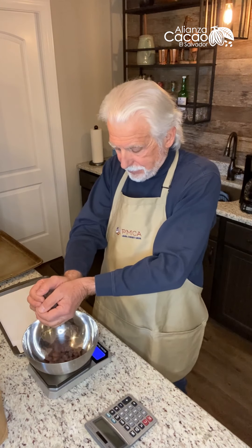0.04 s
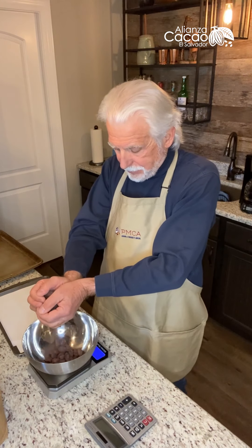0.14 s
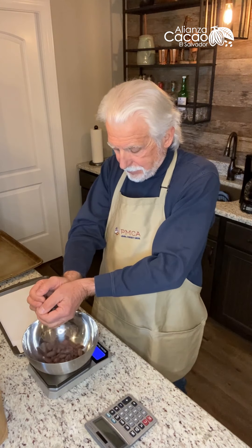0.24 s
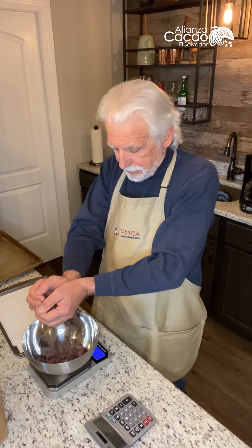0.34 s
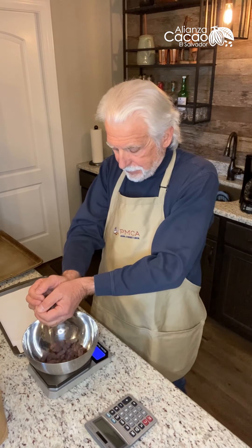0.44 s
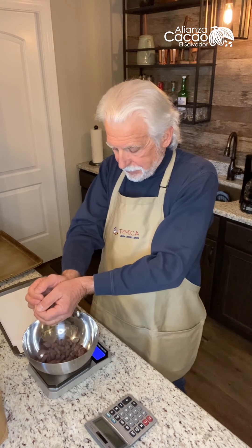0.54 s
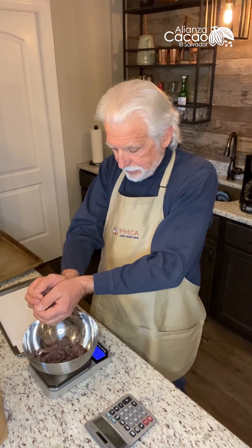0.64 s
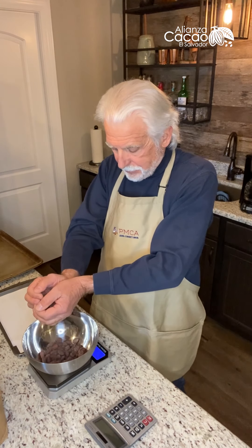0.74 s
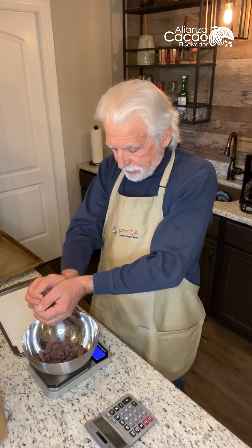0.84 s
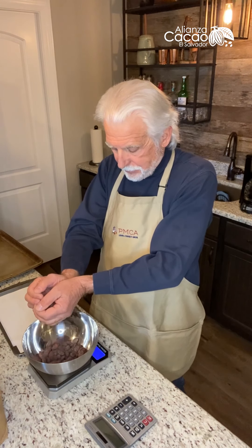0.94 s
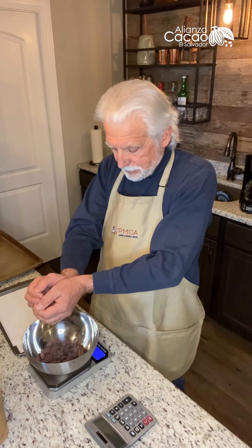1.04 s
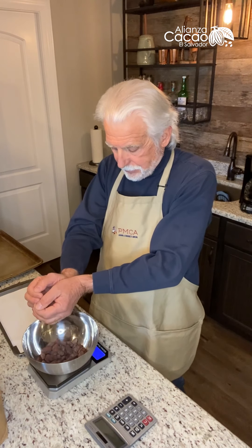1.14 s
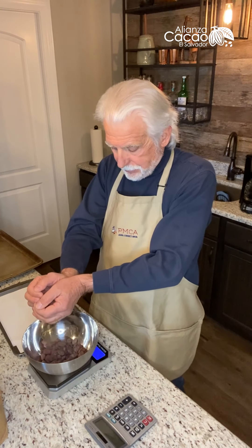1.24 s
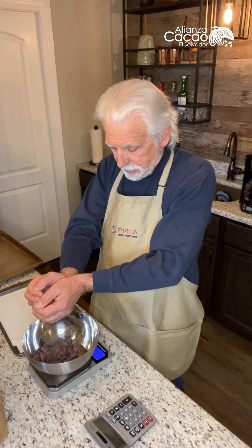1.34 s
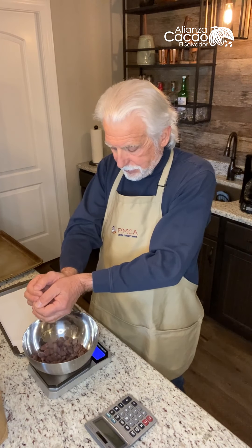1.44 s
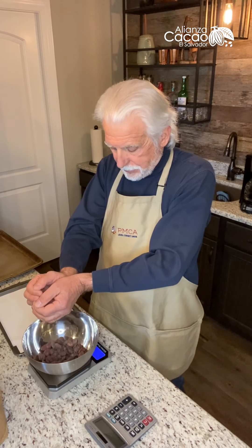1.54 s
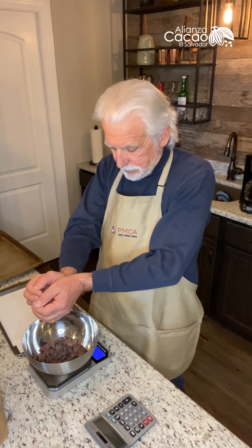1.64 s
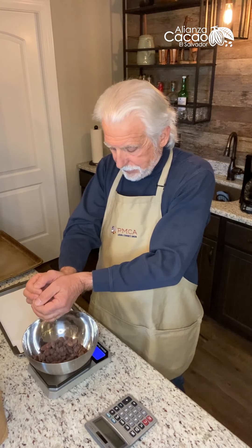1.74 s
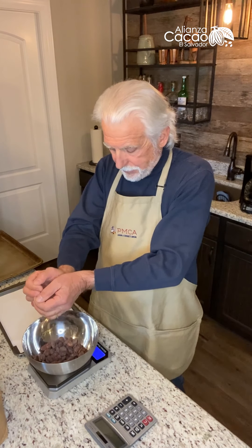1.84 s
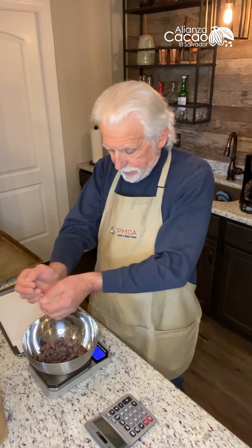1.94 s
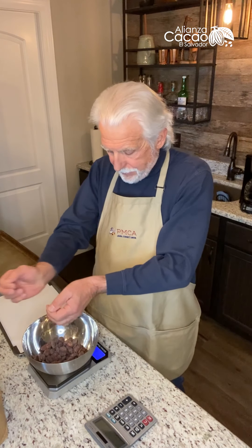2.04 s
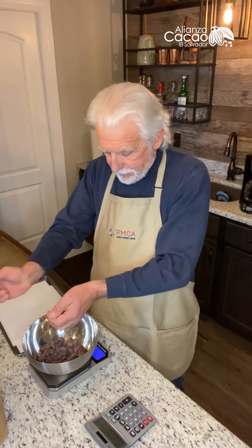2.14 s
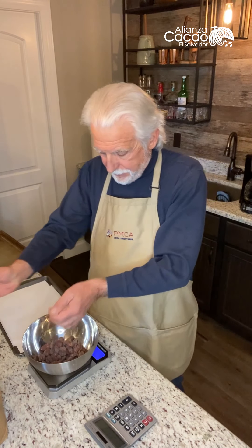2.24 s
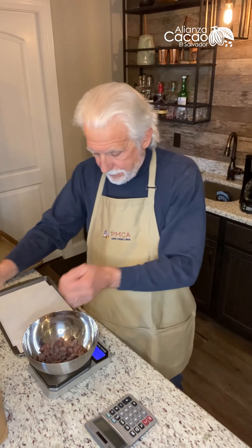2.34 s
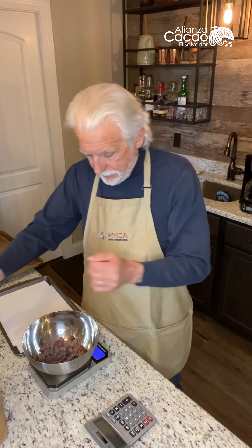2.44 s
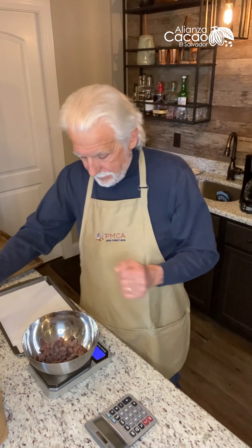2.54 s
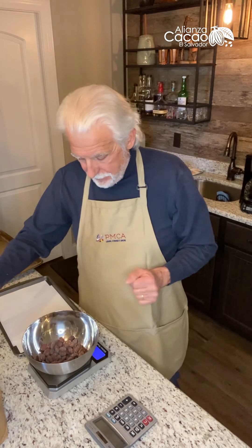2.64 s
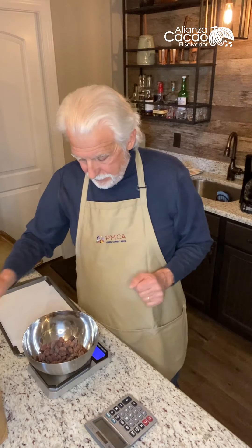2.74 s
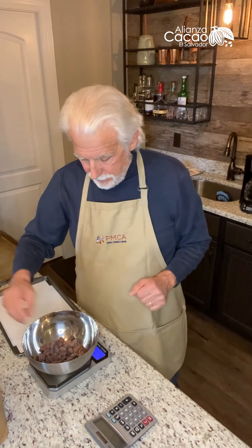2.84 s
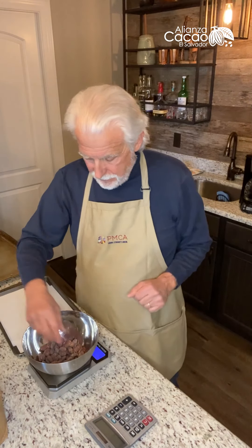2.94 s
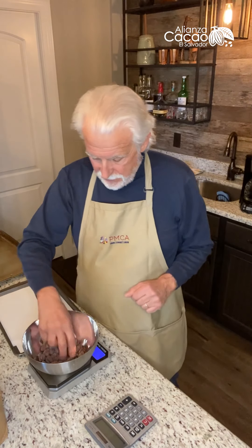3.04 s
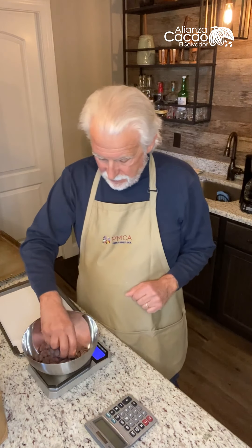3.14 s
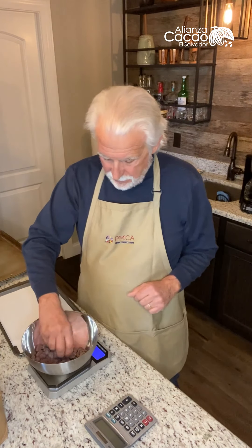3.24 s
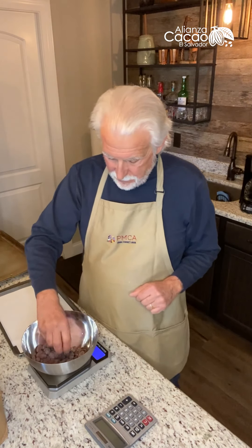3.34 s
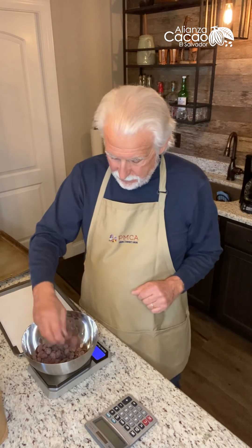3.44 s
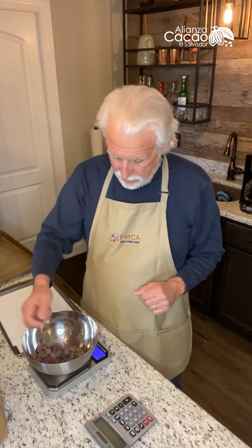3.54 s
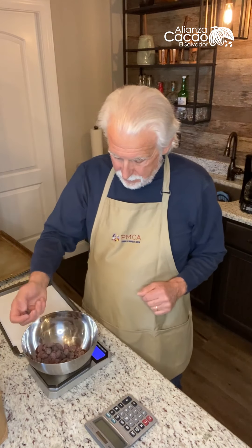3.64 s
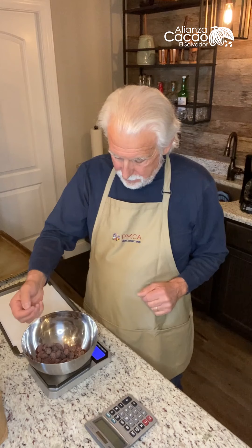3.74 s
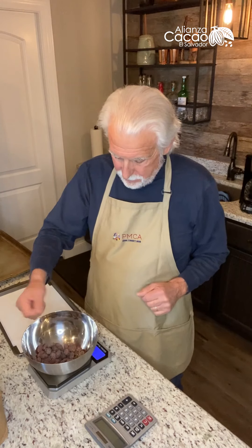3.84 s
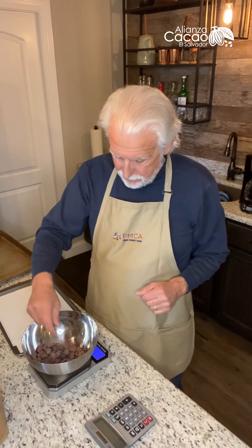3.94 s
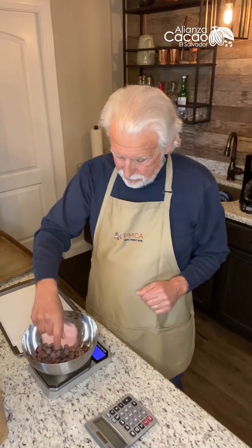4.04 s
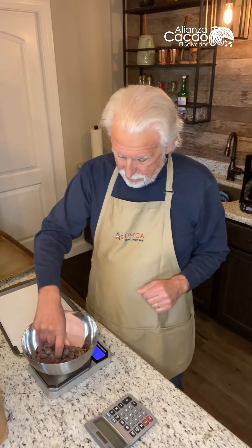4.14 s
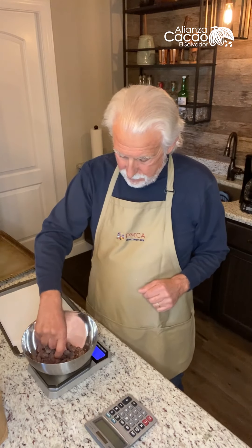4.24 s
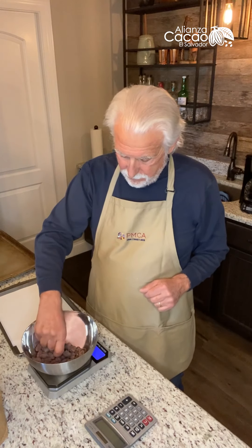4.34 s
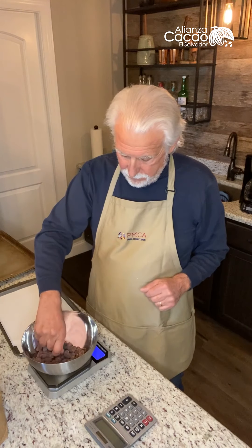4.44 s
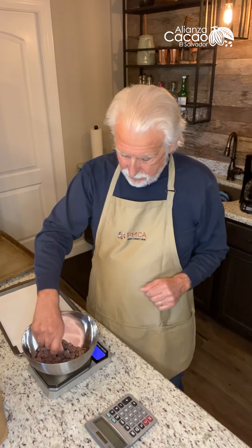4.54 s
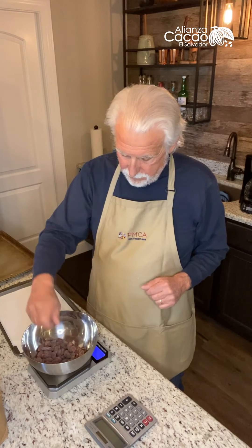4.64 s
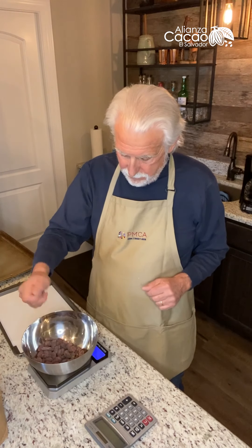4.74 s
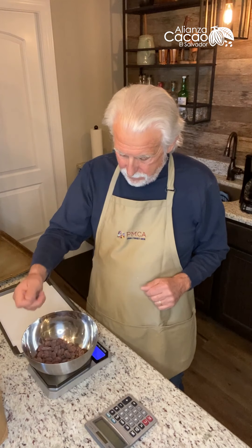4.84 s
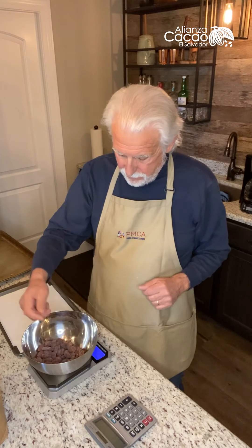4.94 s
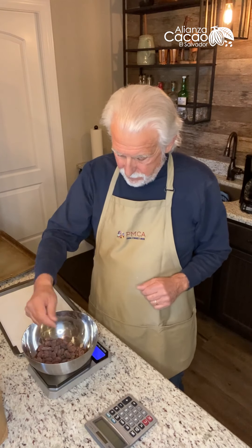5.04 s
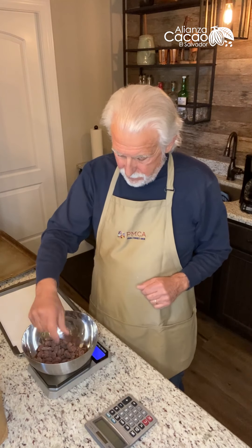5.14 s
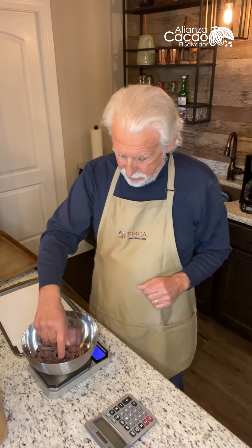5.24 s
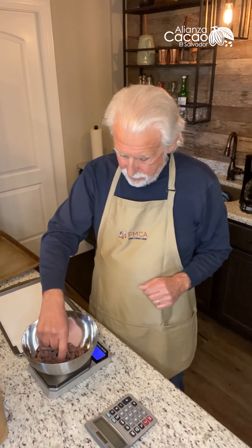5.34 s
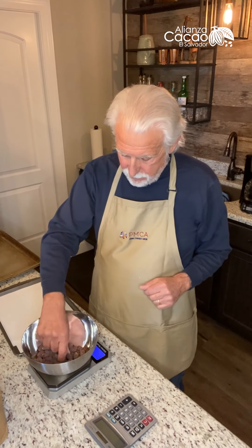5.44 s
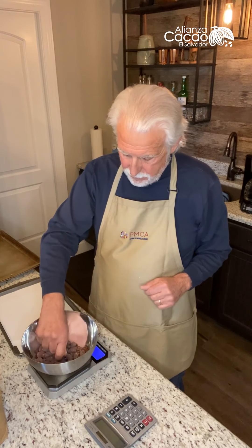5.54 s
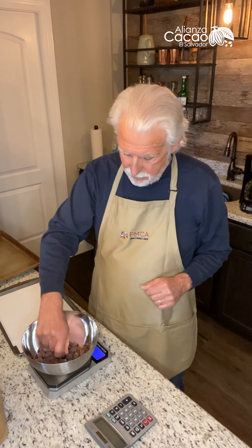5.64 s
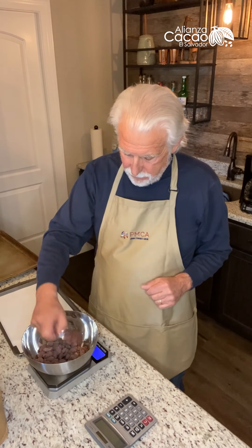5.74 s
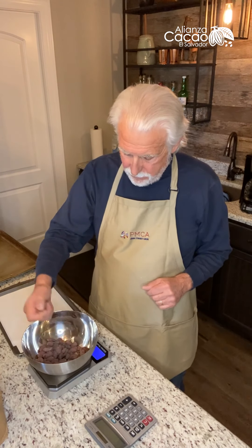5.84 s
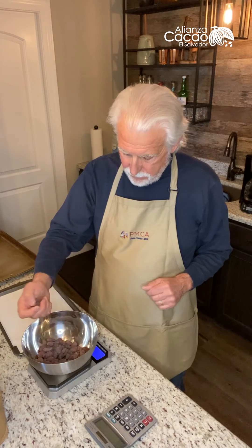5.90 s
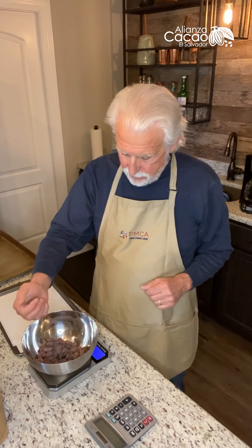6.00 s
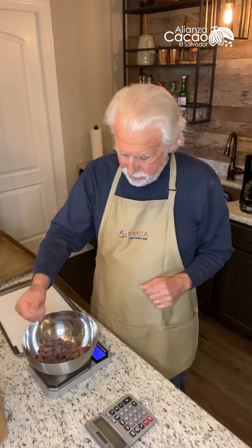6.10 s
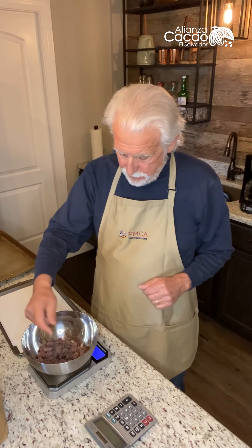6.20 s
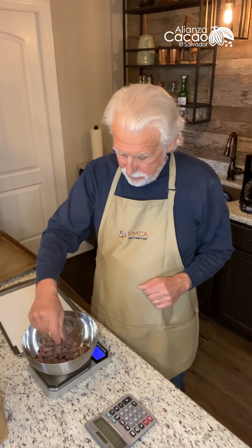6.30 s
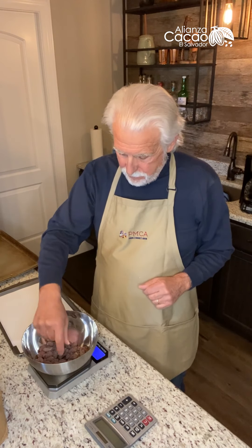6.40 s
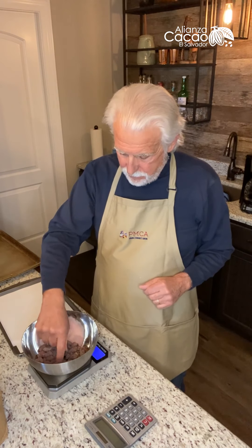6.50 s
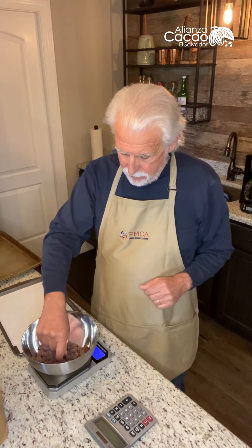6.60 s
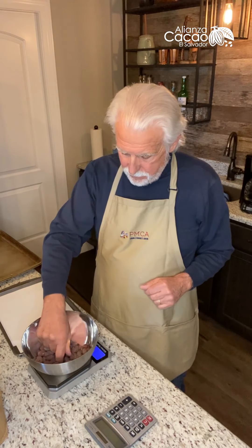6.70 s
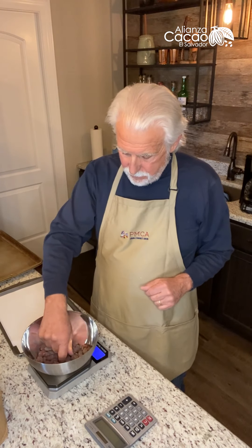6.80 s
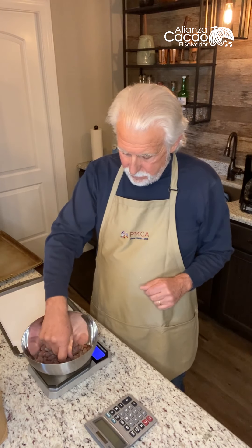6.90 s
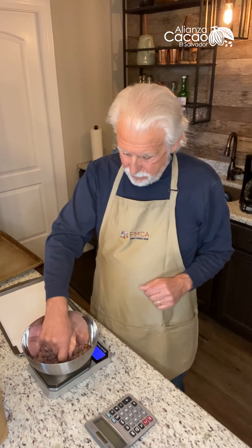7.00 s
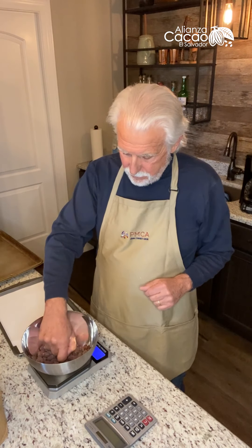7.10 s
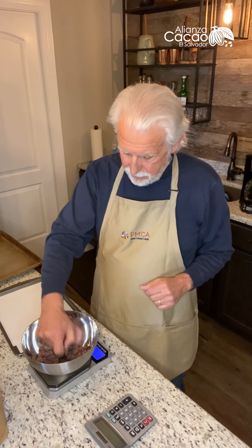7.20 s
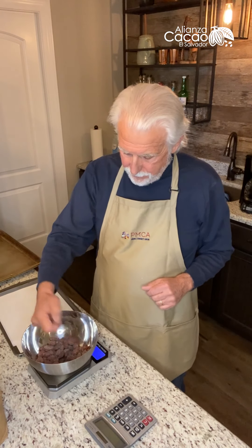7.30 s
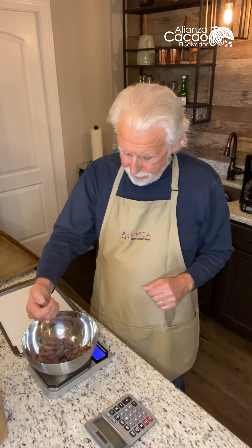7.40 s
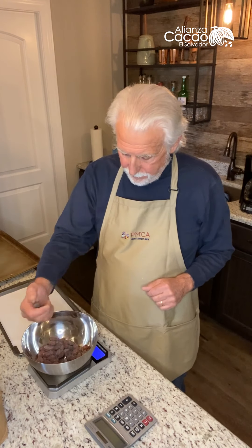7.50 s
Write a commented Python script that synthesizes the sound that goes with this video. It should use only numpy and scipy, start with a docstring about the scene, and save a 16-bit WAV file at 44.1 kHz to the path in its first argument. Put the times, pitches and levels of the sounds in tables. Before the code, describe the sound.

Close by in a hard, lively kitchen, dried cocoa beans pour from two hands into a steel bowl, with dry clicks, dull knocks and bright metallic pings. The dense rattle thins to stray beans, followed by small counter bumps. Then fingers rummage through the beans four times, in softer, crunchy shuffles with gaps between. A low appliance hum and faint rush of air run underneath.

```python
"""In a hard, ringing kitchen, dried cocoa beans fall from two hands into a steel bowl on a kitchen scale.
Then fingers rummage in the bowl four times. Each contact layers a knock of the loaded base (noise and modes),
a dry husk click (noise and a short note) and a ping of the thin wall (a crowd of high modes).
Bumps and light clinks sound on the counter, and an appliance hums in a low rush of air.
Sparse, decaying reflections place the beans and the counter in the room."""
import sys
import numpy as np
from scipy import signal
from scipy.fft import rfft, irfft
from scipy.io import wavfile
from scipy.ndimage import uniform_filter1d, minimum_filter1d

SR = 44100
rng = np.random.default_rng(int(sys.argv[2]) if len(sys.argv) > 2 else 0)


def waveform_to_disk(signal):
    """Save audio, clipped to [-1, 1], as 16-bit WAV at the path in sys.argv[1]."""
    frames = np.transpose(np.atleast_2d(signal))
    scaled = np.clip(frames, -1, 1) * 32767
    samples = np.round(scaled).astype(np.int16)
    wavfile.write(sys.argv[1], SR, samples)


N = 333449
AGE = np.arange(6144) / SR  # time since a contact, s

# Blow levels are rms over 10 ms. Colours and mode levels are relative.
# Single beans striking:
# [t/s, knock level/dB, knock centre f/Hz, click level/dB, click centre f/Hz, ping level/dB, ping centre f/Hz]
BEANS = [(0.005, -27, 1130, -28.5, 4450, -13, 9300), (0.06, -34, 1324, -33, 3900, -35, 8530),
         (0.102, -32, 970, -26.5, 3780, -7.5, 8300), (0.133, -31.5, 1400, -24, 4200, -32, 8450),
         (0.2003, -23.5, 1400, -21, 4200, -23.5, 8800), (0.224, -34, 1390, -31, 3360, -16.5, 9200),
         (0.236, -40, 1190, -42, 4230, -9.5, 8950), (0.25, -22, 1260, -23, 4330, -7.5, 10200),
         (0.2956, -30, 1260, -29, 4660, -10, 9000), (0.304, -24.5, 1120, -28, 3900, -29, 8940),
         (0.3304, -39, 1090, -29.5, 4500, -16, 8800), (0.365, -45, 1200, -44, 3900, -23, 10300),
         (0.404, -33, 930, -31, 4470, -21, 9200), (0.416, -31, 1099, -33, 4760, -16.5, 8370),
         (0.433, -27, 1241, -29.5, 4970, -14, 9770), (0.46, -43, 1299, -33, 2640, -21, 10120),
         (0.465, -29.5, 1360, -33.5, 2000, -31, 10050), (0.489, -48, 1200, -35, 2690, -30, 9400),
         (0.509, -33, 1350, -30, 2500, -28, 9100), (0.5499, -25, 1290, -37, 4330, -16.5, 9400),
         (0.559, -25.5, 1320, -23, 3250, -20.5, 9750), (0.568, -29.5, 1200, -29, 3798, -17, 9580),
         (0.6084, -31, 1030, -30.5, 4770, -11, 8440), (0.6544, -29, 1060, -25.5, 4920, -13.5, 8400),
         (0.7194, -34, 1290, -37, 5300, -24, 7600), (0.788, -39, 1180, -44, 2000, -31, 10100),
         (0.8328, -40.5, 1240, -48, 2400, -30.5, 8300), (0.864, -41.5, 1260, -49, 3340, -41, 9130),
         (0.89, -31.5, 1010, -31.5, 6330, -47, 8680), (0.9005, -42.5, 850, -36.5, 5830, -27, 9800),
         (0.984, -24, 950, -36, 4680, -23.5, 8800), (1.014, -58, 1070, -36.5, 4100, -29.5, 8560),
         (1.0411, -21, 1320, -25, 3000, -32, 8670), (1.061, -55, 1370, -38, 2000, -27, 11500),
         (1.121, -23, 1050, -27.5, 4540, -21, 9100), (1.155, -48, 960, -34.5, 5340, -28, 9500),
         (1.206, -50, 1200, -39, 4600, -31, 9200), (1.2359, -31, 1230, -28.5, 6680, -15, 10700),
         (1.278, -23.5, 936, -35.5, 4050, -33, 9370), (1.2916, -38, 1030, -29.5, 5430, -7.5, 9400),
         (1.3177, -33.5, 990, -33.5, 5000, -25.5, 9600), (1.33, -32, 860, -38, 4550, -28, 9580),
         (1.3894, -31.5, 1100, -29.5, 5500, -21.5, 10200), (1.425, -33, 850, -36.5, 3900, -35, 9800),
         (1.466, -36, 1030, -26, 6470, -21, 7900), (1.4768, -32.5, 895, -33.5, 4280, -24.5, 10300),
         (1.483, -25.5, 950, -30, 4460, -23, 9550), (1.596, -42.5, 1200, -46.5, 3900, -42, 9000),
         (1.729, -55, 888, -55, 4195, -48, 8100), (2.2759, -32.5, 950, -32.5, 5530, -30, 8900),
         (2.3423, -38, 995, -40, 3300, -37, 9080), (3.088, -46, 1224, -63.5, 2000, -81.5, 9200),
         (3.116, -37, 1090, -39.5, 3350, -37, 8600), (3.162, -51, 1270, -36.5, 5660, -34, 7700),
         (3.19, -37, 890, -41, 3000, -38, 8200), (3.205, -42, 970, -39, 3240, -27, 7700),
         (3.249, -41.5, 950, -40, 3340, -38, 9070), (3.32, -38, 990, -52, 2000, -49.5, 8800),
         (3.34, -62, 1290, -37.5, 2210, -54.5, 8850), (3.379, -36, 900, -39.5, 3460, -39, 8740),
         (3.454, -43, 1280, -40, 2380, -59, 9100), (3.532, -41.5, 1080, -45, 2000, -66.5, 8900),
         (4.218, -37.5, 1400, -39.5, 2650, -49, 8950), (4.248, -46, 1290, -51, 2200, -31, 9000),
         (4.291, -47, 1200, -40.5, 3020, -39, 8800), (4.355, -41, 1030, -40, 4380, -29, 10000),
         (4.44, -45, 1400, -55.5, 2400, -54.5, 8800), (4.509, -43.5, 994, -57, 2590, -53.5, 8800),
         (4.587, -46, 900, -53.5, 5500, -52, 8720), (4.563, -50, 1096, -56.5, 3030, -46.5, 9100),
         (4.623, -58.5, 1098, -49.5, 6980, -44.5, 8560), (5.424, -45, 1200, -51, 2630, -49.5, 8500),
         (5.458, -40, 1310, -39, 3350, -42, 8400), (5.538, -42, 1150, -43, 2790, -51.5, 8500),
         (5.571, -37, 1230, -36, 3850, -35.5, 8300), (5.582, -44, 1100, -39, 4160, -43.5, 8000),
         (5.624, -40.5, 1040, -47.5, 2600, -51, 8400), (5.722, -56, 1090, -51.5, 4490, -54, 8400),
         (5.745, -56.5, 1090, -45, 2000, -55, 8400), (5.778, -48, 1200, -57, 2000, -48.5, 9500),
         (5.854, -60, 1200, -65.5, 2596, -59, 8900), (5.899, -52, 1275, -58, 2400, -65.5, 8570),
         (6.585, -50.5, 1075, -58, 3400, -39.5, 9100), (6.615, -55, 1200, -41.5, 2900, -43, 8600),
         (6.64, -51, 950, -42.5, 2850, -56, 8600), (6.694, -40, 1170, -32, 3060, -36, 8700),
         (6.721, -40, 1010, -38, 3450, -43, 8600), (6.81, -45, 1200, -42, 3200, -47, 8600),
         (6.941, -57, 900, -63, 3000, -49.5, 8650), (7.069, -54.5, 1110, -54, 5500, -49, 8200),
         (7.083, -54, 1090, -56.5, 5500, -54, 8500)]
# Hard blows that flex the whole bowl: [t/s, level/dB]
FLEXES = [(0.2004, -21), (0.559, -35), (1.0409, -23), (7.2144, -41)]
# What the flexing bowl rings with: [f/Hz, level/dB, t60/s]
FLEX_MODES = [(967, -8.5, 0.23), (1110, -8.5, 0.17), (1324, 1.5, 0.092), (1457, 0, 0.08), (1503, -7, 0.12),
              (2070, -13.5, 0.12), (2220, -7.5, .09), (2330, -8, .11), (2713, -12, 0.15), (2880, -16, .1)]
# The base of the bowl, damped by the beans: [f/Hz, level/dB, t60/s], f before detuning
BASE_MODES = [(719.8, 2.5, 0.2), (883.4, -4, 0.09), (939, -1, 0.19), (1020, -7, 0.15), (1125, -3.5, 0.19),
              (1320, -1, 0.077), (1404, -1.5, 0.096), (1520, -5.5, 0.14)]
# Colour of the base knock: [f/Hz, level/dB]
KNOCK = [(40, -58.5), (90, -31.5), (200, -29.5), (330, -15.5), (480, -14.5), (720, -5), (1350, -6.5),
         (1600, -5), (1950, -20), (4000, -39)]
# Colour of the husk click: [f/Hz, level/dB], before random variety
HUSK = [(60, -60.5), (600, -29), (1750, -5.5), (2300, 2.5), (3000, 0), (3600, -2.5), (4300, -8), (5600, 0),
        (7000, 2), (10000, -6), (15000, -31.5)]
# Each hollow bean has a short note in this range; its level is against its click
SHELL_HZ, SHELL_T60, SHELL_DB = (1940, 6260), 0.016, -8.5  # Hz, s, dB
# Colour of the wall modes: [f/Hz, level/dB]
WALL = [(7400, -6.5), (8100, -1), (10200, -2), (11000, -4), (13000, 2), (14600, -20), (15600, -20.5)]
# Surges of many small bean contacts, in the bowl, in the supply beside it or in the hand;
# the pour has fewer contacts per second than the stirring, and its first two surges are the hardest:
# [t/s, hold/s, settling/(dB/s), knock level/dB, click level/dB, ping level/dB,
#  hardness/(factor on knock and click centres, before scatter), mean contacts/(1/s)]
SURGES = [(0, 0.35, 287.5, -38, -33.5, -31, 1.55, 142), (0.403, 0.22, 197, -33.5, -34, -26.5, 1.55, 160),
          (1.055, 0.13, 200, -41.5, -41.5, -42, 1.1, 150), (1.384, 0.025, 114, -37.5, -40, -29, 0.73, 230),
          (2.571, 0.13, 119, -63, -64.5, -69.5, 0.88, 380), (3.089, 0.17, 72, -39, -42.5, -35.5, 1.05, 750),
          (3.86, 0.071, 183, -86, -79.5, -76.5, 1.1, 270),
          (4.19, 0.19, 132.5, -43.5, -47.5, -42, 1.25, 480),
          (4.415, 0.19, 284.5, -49.5, -58.5, -53.5, 0.78, 300),
          (4.783, 0.058, 203, -81.5, -80, -65.5, 0.91, 360),
          (4.907, 0.07, 150.5, -76, -70, -78.5, 0.66, 350), (5.055, 0.071, 198, -81, -70.5, -66, 0.91, 300),
          (5.392, 0.17, 69, -41.5, -43, -45.5, 1.1, 480), (6.566, 0.14, 108, -46.5, -49, -49, 1.15, 780),
          (6.69, 0.063, 113, -43.5, -44.5, -42, 1.1, 540), (6.897, 0.1, 255.5, -54.5, -63, -54, 1, 350),
          (7.054, 0.14, 130.5, -49, -55, -49, 1.1, 400), (7.242, 0.039, 119, -54, -63, -79.5, 0.85, 800)]
RISE_S, SAG_DB_PER_S = 0.021, 12.5  # a surge builds up quickly and sags a little from its start
WALL_FOLLOW = 1.1  # the pings drop this many times faster in dB than knocks and clicks
SETTLED_DB = 25  # a surge ends once settling, apart from the sag, has lowered it this far

# Bumps on the counter:
# [t/s, thump level/dB before trim, clack level/dB, tick level/dB, tick centre f/Hz, attack/s]
BUMPS = [(1.7652, -55, -41, -55, 5500, 0.00027), (1.878, -58, -58.5, -80.5, 3020, .001),
         (2.52, -48.5, -53.5, -54, 2970, 0.0029), (2.531, -42, -44, -49, 5080, 0.0018),
         (2.546, -47, -51, -50, 4500, 0.0035), (2.582, -48, -50.5, -53.5, 3510, 0.00092),
         (2.749, -52, -44, -45, 2980, 0.0018), (2.763, -49, -46, -42.5, 2700, 0.0016),
         (5.048, -67, -61, -68, 3700, 0.00042), (5.068, -70.5, -69, -74, 3510, 0.0004),
         (7.2133, -61.5, -38.5, -39.5, 2700, 0.0013), (7.533, -74, -72, -58.5, 4970, 0.00035)]
# Colour of the low thump: [f/Hz, level/dB]
THUMP = [(30, -37.5), (100, -12), (250, -8), (420, 0), (600, -2), (1000, -24), (3000, -91)]
# Colour of the clack: [f/Hz, level/dB]
CLACK = [(50, -40), (300, -27), (800, 7), (1450, 8), (1950, 1), (2500, 1), (3100, -6), (3900, -7),
         (8000, -67)]
# Colour of the tick: [f/Hz, level/dB]
TICK = [(60, -38), (1000, -31.5), (2200, 5.5), (3300, 2.5), (5500, -2.5), (9000, 5), (15000, -14)]
# Light clinks: [t/s, level/dB before trim]
CLINKS = [(3.821, -63), (3.929, -61.5), (5.138, -44), (5.179, -36.5), (5.198, -45.5)]
# What the clinks ring with: [f/Hz, level/dB, t60/s]
CLINK_MODES = [(1200, -7, .015), (1400, 17.5, 0.012), (1560, 6, 0.025), (2000, 11, 0.047),
               (2090, -10.5, 0.41), (2230, 5, 0.11), (2450, -9.5, 0.55), (2386, 17, 0.035),
               (2700, -12, .17), (3080, -10, .04), (3900, -7, 0.026)]
# Beans ticking together as they are picked up: [t/s, level/dB]
PICKS = [(5.96, -64), (6.042, -54.5)]
# Colour of that tick: [f/Hz, level/dB]
PICK = [(300, -36.5), (2000, -9), (3100, -10), (3650, 0), (4300, -6), (5400, -6), (6500, -16), (11000, -14)]

# Tones of the appliance: [f/Hz, level/dB rms]
HUM = [(118.4, -69.5), (152.8, -57), (266.8, -55.5), (297, -59.5), (382.2, -69), (473.7, -65.5),
       (1130, -92.5), (1604, -83.5), (2083, -92.5), (2676, -83.5)]
# Colour of its rush of air: [f/Hz, relative level/dB per Hz]
AIR = [(20, -34.5), (40, -16.5), (62, -2.5), (90, -5), (150, -4.5), (190, -7.5), (255, 2), (330, -4),
       (420, -14.5), (500, -7), (650, -22.5), (1200, -33), (2000, -34), (2600, -30.5), (3100, -37),
       (4500, -42), (9000, -41.5), (12000, -48.5), (15000, -66)]
# Decay of the kitchen: [f/Hz, t60/s]
ROOM_T60 = [(200, 0.47), (1000, 0.7), (2800, 0.55), (5000, 0.42), (8500, 0.4), (15000, 0.4)]
# Room level against the sound sent to it, before the early boost: [f/Hz, level/dB]
ROOM_SEND = [(200, 7.5), (1000, -4.5), (2800, 2.5), (5000, -0.5), (8500, -7), (15000, -8)]
# How alike diffuse sound is at the left and right ports: [f/Hz, likeness/1]
LIKENESS = [(100, 0.99), (300, 0.99), (600, 0.55), (1000, 0.13), (1400, 0.27), (2200, 0.05), (3000, 0.78),
            (5000, 0.78), (8500, 0.77), (15000, 1)]
# Phase by which the left port lags the right: [f/Hz, lag/rad]
PORT_LAG = [(100, -0.5), (1400, 0.33), (2700, 1.5), (3200, 2), (4100, 1.31), (6800, 0.2), (7600, 0.86),
            (9000, 1.22), (11600, 2), (13000, 3.5), (15000, 3.5)]
EDGE_HZ = 15000  # upper band limit


def bean_strikes(wall):
    """Each distinct strike excites base, husk and wall together; listed hard blows flex the whole bowl."""
    out = np.zeros(N)
    for s, knock_db, knock_hz, click_db, click_hz, ping_db, ping_hz in BEANS:
        add(out, s, amp(knock_db) * base_knock(knock_hz, ring_db=-1.5))
        add(out, s, amp(click_db) * husk_click(click_hz, t60=0.024))
        add(out, s, amp(ping_db) * wall_ping(wall, ping_hz))
    for s, db in FLEXES:
        add(out, s, amp(db) * ring(FLEX_MODES, spread=0.15, size=8192))
    return out


def base_knock(centre_hz, ring_db, width_hz=380, load=0.016):
    """A dull knock sets the base ringing; the shifting load detunes each mode a little."""
    lift = lambda hz: 20 * np.log10(around(hz, centre_hz, width_hz))
    colour = [(hz, db + lift(hz)) for hz, db in KNOCK]
    push = contact(colour, chatter_db=-7, t60=0.044)
    modes = [(hz * (1 + load * rng.standard_normal()), db + lift(hz), t60) for hz, db, t60 in BASE_MODES]
    return unit_blow(push + amp(ring_db) * ring(modes))


def husk_click(centre_hz, t60, width_hz=1500, variety_db=3.0):
    """A dry shell snaps against its neighbours, with random colour and a random short note."""
    hz, db = np.transpose(HUSK)
    db = db + 20 * np.log10(around(hz, centre_hz, width_hz))
    db = db + variety_db * rng.standard_normal(len(hz))
    snap = contact(np.transpose([hz, db]), chatter_db=6.0, t60=t60)
    note_hz = np.clip(centre_hz * 2 ** rng.uniform(-0.45, 0.45), *SHELL_HZ)
    note = ring([(note_hz, 0, SHELL_T60)], contact_s=0.00017)
    return unit_blow(snap + amp(SHELL_DB) * note)


def wall_modes(count=220, contact_s=0.00007):
    """A curved shell has a crowd of modes just above its ring frequency, thinning out higher up."""
    place = (np.arange(count) + rng.random(count)) / count
    hz = 7480 + 8200 * place ** 1.5
    # most of the ring is soaked up by the beans at once; a weaker part lasts longer
    fade = amp(-60 * AGE / 0.035) + amp(-15.0) * amp(-60 * AGE / 0.055)
    fade *= 1 - np.exp(-AGE / contact_s)  # builds up while the bean touches the steel
    spin = np.exp(2j * np.pi * hz[:, None] * AGE)
    return hz, (amp(read(WALL, hz))[:, None] * fade * spin).astype(np.complex64)


def wall_ping(wall, centre_hz, width_hz=950):
    """A bean hits bare steel and favours modes near the centre; a harder contact reaches higher ones."""
    hz, waves = wall
    start = rng.standard_normal((len(hz), 2)) @ [1, 1j] + 0.15  # the modes start partly in step
    weight = (start * around(hz, centre_hz, width_hz)).astype(np.complex64)
    return unit_blow((weight @ waves).real)


def shifting_beans(wall, spread_db=3.0, count=24):
    """Surges of small contacts, hundreds a second, drawn from a pool of blows, as the beans roll and settle."""
    out = np.zeros(N)
    for start, hold_s, settle_db_per_s, *parts_db, hardness, per_s in SURGES:
        levels = amp(parts_db)[:, None] * surge(hold_s, settle_db_per_s)
        levels = levels * slips(levels.shape[1])
        strength = amp(spread_db * np.minimum(rng.exponential(1, N), 3))
        hits = strength * (rng.random(N) < per_s / SR)
        hits = (hits * rng.choice([-1, 1], N))[:levels.shape[1]]
        # even out the density, so that the surge sets the level
        energy = abs(uniform_filter1d(hits ** 2, size=2100))
        hits /= np.sqrt(energy * 0.01 * SR + 1e-3)
        blows = []
        for firm in hardness * rng.uniform(0.61, 1.03, count):
            knock = base_knock(1000 * firm, ring_db=-0.5)
            click = husk_click(3000 * firm, t60=0.03)
            blows.append([knock, click, wall_ping(wall, rng.uniform(7400, 11000))])
        blows = np.array(blows)
        pick = rng.integers(0, count, N)
        for i in np.flatnonzero(hits):
            add(out, start + i / SR, hits[i] * levels[:, i] @ blows[pick[i]])
    return out


def surge(hold_s, settle_db_per_s):
    """Rise, sagging hold and settling of one surge: the gains of knocks, clicks and pings."""
    age = np.arange(0, hold_s + SETTLED_DB / settle_db_per_s, 1 / SR)
    drop_db = SAG_DB_PER_S * age + settle_db_per_s * np.maximum(age - hold_s, 0)
    return np.minimum(age / RISE_S, 1) ** 2 * amp(-np.outer([1, 1, WALL_FOLLOW], drop_db))


def slips(size, slip_s=0.016, slip_db=2.3):
    """The beans give way in fits: knocks, clicks and pings lurch partly together, partly each by itself."""
    at = np.arange(size) / SR / slip_s
    shared, *own = rng.standard_normal((int(at[-1]) + 2, 4)).T
    knots = np.arange(len(shared))
    lurch_db = [slip_db * np.interp(at, knots, shared + part) for part in own]
    return amp(lurch_db) / amp(slip_db / 2)


def counter(thumps_db, clinks_db):
    """The small sounds beside the bowl: bumps, clinks and picked-up beans; dB trims for thumps and clinks."""
    return counter_bumps(thumps_db) + light_clinks(clinks_db) + picked_beans()


def counter_bumps(trim_db):
    """A bump is a low thump, a clack and a tick; soft things take longer to land."""
    out = np.zeros(N)
    for s, thump_db, clack_db, tick_db, tick_hz, attack_s in BUMPS:
        tick_colour = [(hz, db + 20 * np.log10(around(hz, tick_hz, width_hz=900))) for hz, db in TICK]
        thump = contact(THUMP, chatter_db=2, t60=0.044)
        clack = contact(CLACK, chatter_db=2.5, t60=0.096)
        tick = contact(tick_colour, chatter_db=-9.5, t60=0.023)
        landing = 1 - np.exp(-AGE / attack_s)
        for db, blow in ((thump_db + trim_db, thump), (clack_db, clack), (tick_db, tick)):
            add(out, s, amp(db) * unit_blow(blow * landing))
    return out


def light_clinks(trim_db):
    """A light clink is a handful of dying modes."""
    out = np.zeros(N)
    for s, db in CLINKS:
        add(out, s, amp(db + trim_db) * ring(CLINK_MODES, spread=0.15, size=16384))
    return out


def picked_beans():
    """Beans tick together as they are picked up: a bright push with a very short chatter."""
    out = np.zeros(N)
    for s, db in PICKS:
        add(out, s, amp(db) * contact(PICK, chatter_db=0.5, t60=0.019))
    return out


def contact(colour, chatter_db, t60):
    """One sharp push followed by a short, dying chatter of noise, both given the same colour."""
    push = unit_blow((AGE == 0).astype(float))
    chatter = unit_blow(rng.standard_normal(len(AGE)) * amp(-60 * AGE / t60))
    return unit_blow(coloured(push + amp(chatter_db) * chatter, colour))


def ring(modes, spread=0.35, size=len(AGE), contact_s=0.0006):
    """Dying modes that build up during the contact; their strengths depend on the place that is struck."""
    hz, db, t60 = np.transpose(modes)[:, :, None]
    age = np.arange(size) / SR
    weight = 1 + spread * rng.standard_normal(hz.shape)  # a random striking place
    tones = np.sin(2 * np.pi * (hz * age + rng.random(hz.shape)))
    waves = weight * amp(db - 60 * age / t60) * tones
    return unit_blow(waves.sum(0) * (1 - np.exp(-age / contact_s)))


def around(hz, centre_hz, width_hz):
    """Gain of a broad resonance."""
    return 1 / np.sqrt(1 + ((hz - centre_hz) / width_hz) ** 2)


def coloured(x, colour):
    """Causal (minimum-phase) filter with the given spectrum."""
    log_gain = np.log(amp(read(colour, abs(np.fft.fftfreq(len(x), 1 / SR)))))
    response = np.exp(np.conj(signal.hilbert(log_gain)))
    return np.fft.ifft(np.fft.fft(x) * response).real


def appliance(waver_hz=5, waver=0.27, port_turn=0.39, knot_hz=100):
    """Wavering motor tones in a low rush of air; each tone meets the ports out of step by port_turn rad."""
    t, hz = np.arange(N) / SR, np.fft.rfftfreq(N, 1 / SR)
    noise = rng.standard_normal((2, N))
    air = evened(diffuse(irfft(rfft(noise) * amp(read(AIR, hz)), N)))
    knots = np.arange(0, N / SR + 1, 1 / knot_hz)
    pole = np.exp(-2 * np.pi * waver_hz / knot_hz)
    hum = np.zeros((2, N))
    for tone_hz, db in HUM:
        drifts = [evened(signal.lfilter([1], [1, -pole], z)) for z in rng.standard_normal((2, len(knots)))]
        swell, sway = (waver * np.interp(t, knots, drift) for drift in drifts)  # level, phase
        lead = port_turn * rng.permutation(2)[:, None]
        phase = 2 * np.pi * (tone_hz * t + rng.random()) + sway + lead
        hum += amp(db) * evened((1 + swell) * np.sin(phase))
    return amp(-54.5) * air + hum


def kitchen(x, size=32768, spacing=16):
    """Sparse reflections from counter, cupboards and walls, each band dying at its own speed."""
    taps = np.zeros((2, size))
    at = np.arange(8 * spacing, size - spacing, spacing)
    at = at + rng.integers(0, spacing, (2, len(at)))
    np.put_along_axis(taps, at, rng.choice([-1.0, 1.0], at.shape), 1)
    hz, t, bands = signal.stft(diffuse(taps), SR, nperseg=256)
    t60 = read(ROOM_T60, hz)[:, None]
    fade = amp(read(ROOM_SEND, hz)[:, None] - 60 * t / t60)
    fade = fade * np.sqrt(2 * np.log(1000) * spacing / (t60 * SR))  # same energy for any t60
    near = 1 + np.exp(-t / 0.033)  # the counter top answers first
    tail = signal.istft(bands * fade * near, SR, nperseg=256)[1]
    return signal.fftconvolve(x[None], tail, axes=1)[:, :N]


def diffuse(pair):
    """Makes two unrelated signals as alike as sound from all sides is at the two ports."""
    a, b = rfft(pair)
    same = np.clip(read(LIKENESS, np.fft.rfftfreq(pair.shape[1], 1 / SR)), -1, 1)
    common, apart = a * np.sqrt((1 + same) / 2), b * np.sqrt((1 - same) / 2)
    return irfft(np.array([common + apart, common - apart]), pair.shape[1])


def amp(db):
    """Decibels to gain."""
    return 10 ** (np.asarray(db) / 20)


def evened(x):
    """Scales to rms 1."""
    return x / np.sqrt(np.mean(x ** 2) + 1e-20)


def unit_blow(x):
    """Scales a blow so that its energy equals 10 ms at rms 1."""
    return x / np.sqrt(np.sum(x ** 2) / (0.01 * SR))


def read(points, hz):
    """Reads a table on a log-frequency axis."""
    f, value = np.transpose(points)
    return np.interp(np.log(hz + 1), np.log(f + 1), value)


def add(mix, s, sound):
    """Mixes a sound in at time s."""
    part = mix[max(round(s * SR), 0):][:len(sound)]
    part += sound[:len(part)]


def scene():
    """Beans and counter, direct and through the kitchen, over the appliance."""
    wall = wall_modes()
    surges, room = shifting_beans(wall), np.zeros((2, N))
    turn = 2 * np.pi * 2.3 * np.arange(N) / SR  # 2.3 turns a second
    # two room patterns with freshly drawn blows, as each blow radiates another fine colour in every direction;
    # the surges turn between the two patterns
    for paths in (np.cos(turn), np.sin(turn)):
        strikes = bean_strikes(wall)
        bumps = counter(thumps_db=-0.5, clinks_db=-8.5)
        beans = strikes * np.sqrt(0.5) + surges * paths
        room += kitchen(amp(-0.55) * beans + amp(-3.5) * bumps)
    return bean_strikes(wall) + surges + bumps + room + appliance()


def record(dry):
    """The left port is phase-shifted against the right; a fast limiter holds sharp peaks; then the band limit."""
    lag = read(PORT_LAG, np.fft.rfftfreq(N, 1 / SR))
    left = irfft(rfft(dry[0]) * np.exp(-1j * lag), N)
    pair = np.array([left, dry[1]])
    gain = 1 / np.maximum(abs(pair).max(0), 1)
    gain = uniform_filter1d(minimum_filter1d(gain, size=31), size=31)
    lowpass = signal.firwin(511, EDGE_HZ, window=("kaiser", 9), fs=SR)
    return signal.oaconvolve(pair * gain, lowpass[None], "same")


dry = scene()
out = record(dry)
waveform_to_disk(out)
```